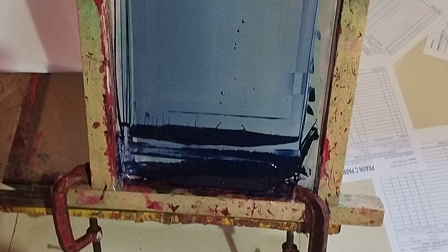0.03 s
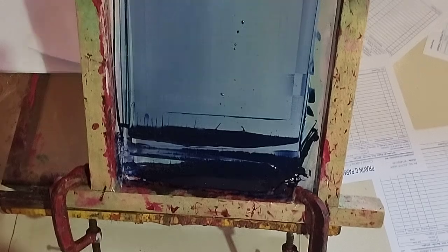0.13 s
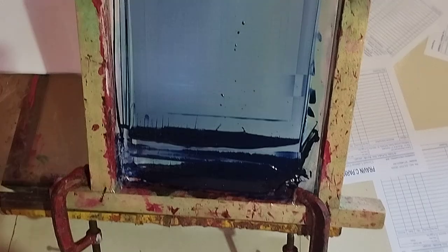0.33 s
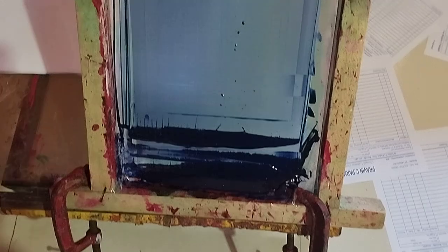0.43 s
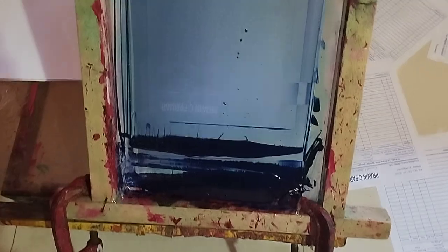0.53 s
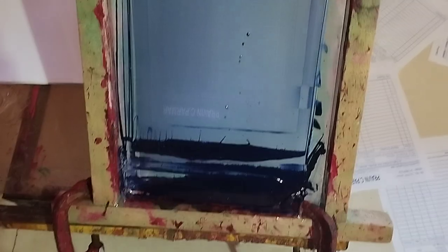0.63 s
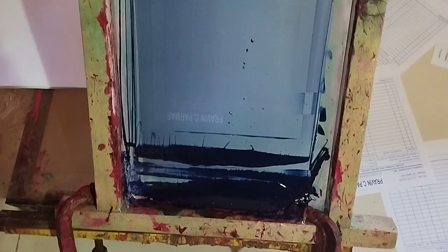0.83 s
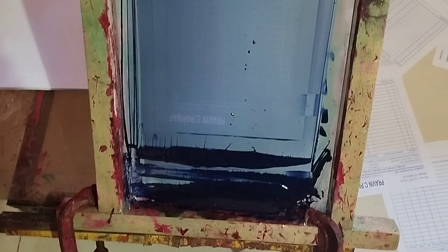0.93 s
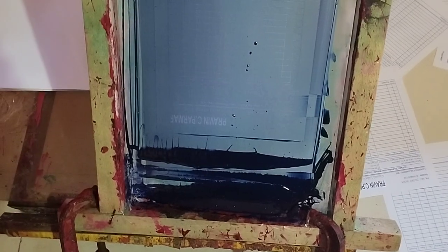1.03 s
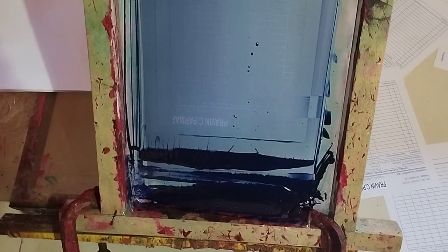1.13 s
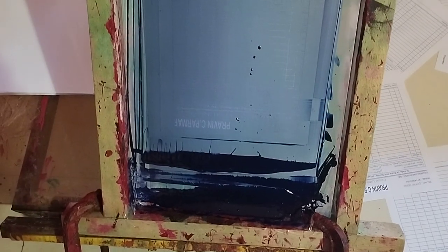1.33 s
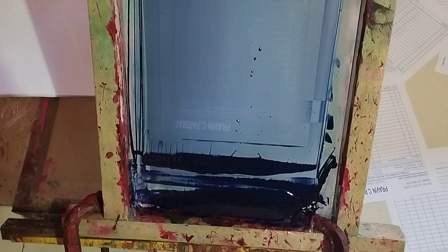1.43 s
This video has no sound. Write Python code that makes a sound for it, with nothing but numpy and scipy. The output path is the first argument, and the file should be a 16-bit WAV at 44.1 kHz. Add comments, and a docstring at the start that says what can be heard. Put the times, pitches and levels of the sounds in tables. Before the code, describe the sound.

Low, steady background rumble and hiss of a quiet room, with one soft microphone bump.

```python
"""Quiet workroom, hand-held camera

The sound opens abruptly as the camera switches on: low room rumble, droning resonances and faint
machine hum under the hiss of two microphones. One handling knock presses on the right microphone
and leaves the camera wobbling. Fingers brush the case faintly, and a low boom swells late."""
import sys
import numpy as np
from scipy import signal
from scipy.fft import rfft, irfft
from scipy.io import wavfile

SR = 44100
rng = np.random.default_rng(int(sys.argv[2]) if len(sys.argv) > 2 else 0)


def int16_out(signal):
    """Quantize to a 16-bit WAV file."""
    q = np.round(np.clip(np.atleast_2d(signal).T, -1, 1) * 32767)
    wavfile.write(sys.argv[1], SR, q.astype(np.int16))


N = 66150
T = np.arange(N) / SR
HZ = np.fft.rfftfreq(N, 1 / SR)


def amp(db):
    """Decibels to gain."""
    return 10 ** (np.asarray(db) / 20)


def unit_rms(x):
    """Scales to an rms of one."""
    return x / np.sqrt(np.mean(x ** 2) + 1e-20)


def over_frequency(points):
    """A curve for each value column, joined on a log frequency axis."""
    freq_hz, *columns = np.transpose(points)
    return np.array([np.interp(np.log(HZ + 1), np.log(freq_hz + 1), c) for c in columns])


def fader(points):
    """Gain over time from points in decibels."""
    return amp(np.interp(T, *np.transpose(points)))


def resonance(centre_hz, half_width_hz):
    """A resonant peak over frequency."""
    return 1 / (1 + ((HZ - centre_hz) / half_width_hz) ** 2)


def noise(spectrum, correlation=0):
    """Stereo noise of rms one; correlation 0 is wide, 1 is mono."""
    left, independent = rfft(rng.standard_normal((2, N)))
    right = correlation * left + np.sqrt(1 - correlation ** 2) * independent
    return unit_rms(irfft(np.array([left, right]) * spectrum, N))


def tone(pitch_hz, wander_hz=1.99, wander_rate_hz=5.2):
    """A sine of rms one whose pitch wanders slightly."""
    wander = wander_hz * noise(resonance(0, wander_rate_hz))[0]
    cycles = np.cumsum(pitch_hz + wander - wander.mean()) / SR
    return unit_rms(np.sin(2 * np.pi * (cycles + rng.random())))


# Dark colour of the room: freq_hz, gain_db
ROOM_EQ = [(20, -15.5), (65, -16), (115, -24), (180, -19), (235, -17), (340, -21.5), (600, -24.5),
           (980, -28), (1500, -34), (2500, -34), (6000, -56)]
# Stereo image, narrowest in the upper bass: freq_hz, correlation
ROOM_IMAGE = [(30, 0.1), (120, 0.9), (240, 0.85), (480, 0.71), (950, 0.01), (1900, 0)]
# Bass resonances, pre-fader: centre_hz, half_width_hz, level_db
ROOM_RESONANCES = [(79.2, 6.3, -56), (102.2, 6.1, -59.5), (146.3, 16, -57.5)]
# Fade-in shared by room tone and machine hum: time_s, gain_db
ROOM_FADER = [(.06, -12), (.13, -4), (.2, -0.5), (.4, -1), (.6, 0), (1.2, -1), (1.5, 0.9)]

def room_tone():
    """Broad, dark noise with the room's resonances droning in it."""
    bed = amp(-51) * noise(amp(over_frequency(ROOM_EQ)), over_frequency(ROOM_IMAGE)[0])
    modes = sum(amp(db) * noise(resonance(hz, half_width_hz), correlation=0.81)
                for hz, half_width_hz, db in ROOM_RESONANCES)
    return fader(ROOM_FADER) * (bed + modes)


# Sub-bass colour: freq_hz, gain_db
RUMBLE_EQ = [(6, -4), (24, 8), (36, -8.5), (58, -9.5), (85, -9.5), (115, -34), (300, -56)]
# The rumble rises, holds and eases: time_s, level_db
RUMBLE_FADER = [(.06, -67), (.19, -62), (.28, -45), (.6, -45.5), (1.1, -44.5), (1.3, -47), (1.5, -52)]

def deep_rumble():
    """Sub-bass noise that puts weight under the room."""
    return fader(RUMBLE_FADER) * noise(amp(over_frequency(RUMBLE_EQ)), correlation=0.71)


# Uneven build of the wash: time_s, level_db
WASH_FADER = [(.06, -69.5), (.38, -70), (.54, -63.5), (.68, -76), (.9, -67), (1.14, -58.5), (1.3, -61.5),
              (1.5, -59)]

def midrange_wash():
    """A faint, wide band of noise that slowly grows."""
    band = resonance(centre_hz=1006, half_width_hz=460)
    return fader(WASH_FADER) * noise(band, over_frequency(ROOM_IMAGE)[0])


# Machine tones, pre-fader: pitch_hz, left_db, right_db
MACHINE_TONES = [(100.2, -58, -59), (257, -68.5, -68.5), (426.6, -75.5, -68), (503, -76, -76),
                 (639, -74.5, -68.5), (736.3, -74.5, -66.5), (877, -71, -75), (993, -80, -73)]

def machine_hum():
    """Thin, steady tones of machines, fading in with the room."""
    tones = sum(amp([[left_db], [right_db]]) * tone(hz) for hz, left_db, right_db in MACHINE_TONES)
    return fader(ROOM_FADER) * tones


# Four swells of the drone: time_s, level_db
DRONE_FADER = [(.06, -65), (.2, -64), (.52, -66.5), (.63, -48), (.75, -56), (.86, -64), (.97, -51),
               (1.06, -62.5), (1.17, -49.5), (1.25, -66.5), (1.37, -50), (1.5, -62.5)]

def bass_drone():
    """One bass note that swells and sinks."""
    return fader(DRONE_FADER) * tone(pitch_hz=140.5)


# Colour of the hiss: freq_hz, left_gain_db, right_gain_db
HISS_EQ = [(97, -0.5, -14.5), (1950, -8, -4.5), (3550, -4, -3), (4440, -3, -0.5), (5940, -5.5, 2),
           (6660, -9.5, 1.9), (7550, -11.5, -3), (8100, -23, -8), (9340, -11, -5.5), (10200, -13, -10),
           (11000, -20.5, -19), (12000, -7, -10.5), (14700, -4.5, -6), (16200, -9.5, -12.5)]
# The hiss fades up, then eases off: time_s, gain_db
HISS_FADER = [(.06, -6), (.14, -2.5), (.2, 1.6), (.28, 3.5), (.42, -0.1), (.53, 2), (.62, -0.7), (.9, -0.3),
              (1.1, 0.1), (1.3, -1.5), (1.5, -1.5)]

def microphone_hiss():
    """Each microphone's own smooth noise, independent left and right."""
    return amp(-53.5) * fader(HISS_FADER) * noise(amp(over_frequency(HISS_EQ)))


KNOCK_S = 0.2178

def knock(rise_s=0.00024, leak_s=0.072, tick_hz=2250, tick_decay_s=0.00034):
    """A tick and a pressure step that leaks away, on the right microphone only."""
    age = np.maximum(T - KNOCK_S, 0)
    pressure = -amp(-17) * (1 - np.exp(-age / rise_s)) * np.exp(-age / leak_s)
    tick = -amp(-37) * np.sin(2 * np.pi * tick_hz * age) * np.exp(-age / tick_decay_s)
    return np.array([np.zeros(N), pressure + tick])


# Low modes of the shaking camera: pitch_hz, level_db, t60_s
WOBBLE_MODES = [(21.2, -34, 1), (73.5, -38, 0.39), (101.1, -40.5, 0.8)]

def camera_wobble(delay_s=0.0206, rise_s=0.006):
    """Just after the knock the camera shakes in the hand, alike on both microphones."""
    age = np.maximum(T - KNOCK_S - delay_s, 0)
    ring = -sum(amp(db - 60 * age / t60_s) * np.sin(2 * np.pi * hz * age)
                for hz, db, t60_s in WOBBLE_MODES)
    return ring * (1 - np.exp(-age / rise_s))


# Finger strokes on the case: peak_s, length_s, right_level_db, centre_hz, half_width_hz
FINGER_STROKES = [(0.271, 0.052, -57.5, 2656, 746), (.527, .075, -56, 2543, 191),
                  (.715, 0.15, -57.5, 5930, 1110), (0.822, 0.03, -56.5, 5200, 900)]

def finger_brushes(glide_hz_per_s=2800, left_trim_db=-1.5):
    """Soft swells of friction noise in a resonance that climbs as the finger slides."""
    strokes = np.zeros((2, N))
    for peak_s, length_s, db, centre_hz, half_width_hz in FINGER_STROKES:
        band = resonance(0, half_width_hz)
        friction = noise(band) + 1j * noise(band)
        cycles = np.cumsum(centre_hz + glide_hz_per_s * (T - peak_s)) / SR
        rub = (friction * np.exp(2j * np.pi * cycles)).real  # shifts the band up to the gliding centre
        swell = np.exp(-(2 * (T - peak_s) / length_s) ** 2)
        strokes += amp(db) * swell * unit_rms(rub)
    return amp([[left_trim_db], [0]]) * strokes


# Swell of the boom: time_s, level_db
BOOM_FADER = [(1.25, -62), (1.36, -56), (1.43, -46.5), (1.5, -50)]

def late_boom():
    """A low tone that stays buried until it swells near the end."""
    return fader(BOOM_FADER) * tone(pitch_hz=61.9)


def scene():
    """Room, hum, hiss and handling together."""
    room = room_tone() + deep_rumble() + midrange_wash()
    hum = machine_hum() + bass_drone() + late_boom()
    return room + hum + microphone_hiss() + knock() + camera_wobble() + finger_brushes()


def record(dry, switch_on_s=0.061, fade_s=0.0028, cutoff_hz=15880):
    """The input snaps open, and a steep low-pass trims the top treble."""
    opened = dry * np.clip((T - switch_on_s) / fade_s, 0, 1)
    low_pass = signal.firwin(1023, cutoff_hz, window=("kaiser", 9), fs=SR)
    return signal.oaconvolve(opened, low_pass[None], "same")


dry = scene()
out = record(dry)
int16_out(out)
```